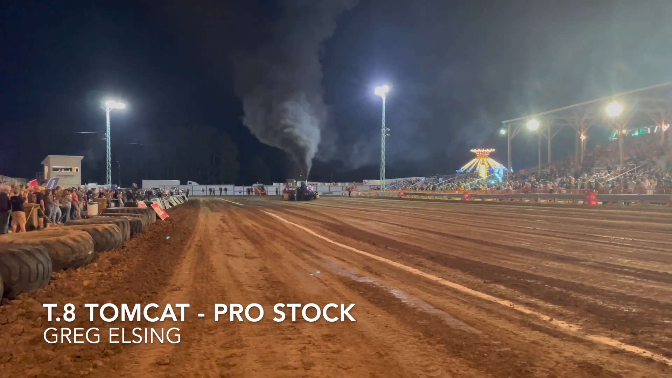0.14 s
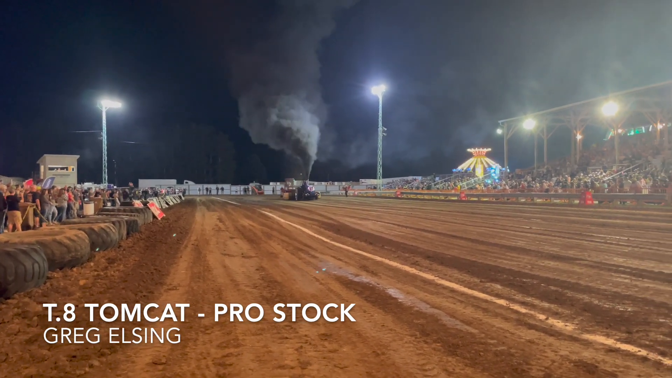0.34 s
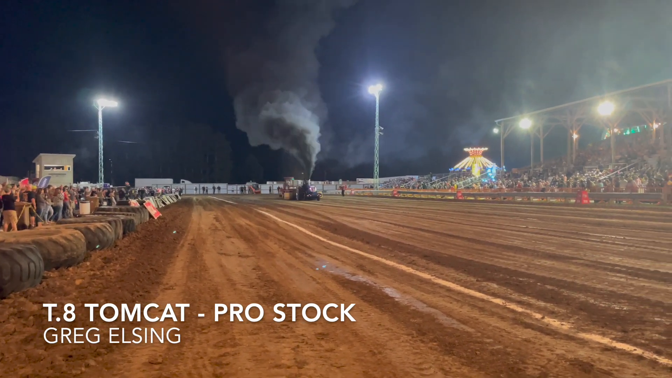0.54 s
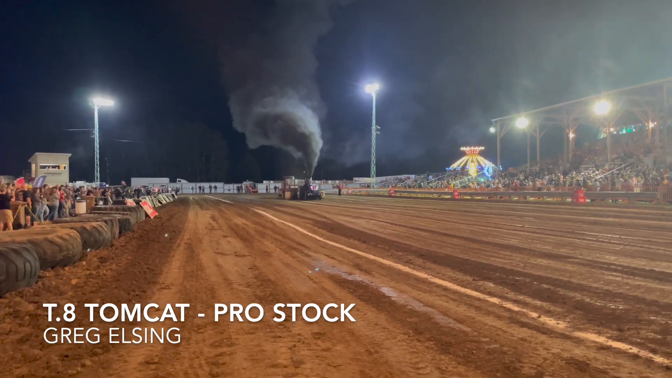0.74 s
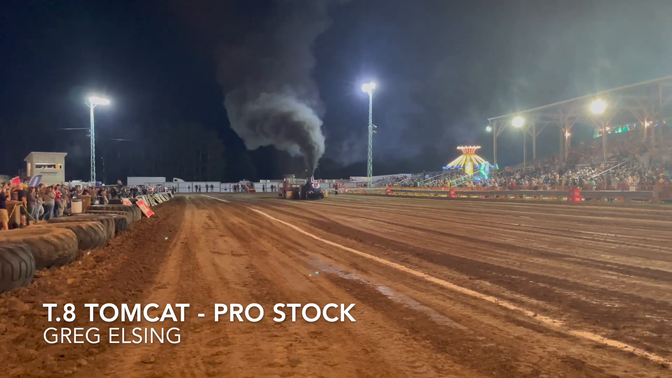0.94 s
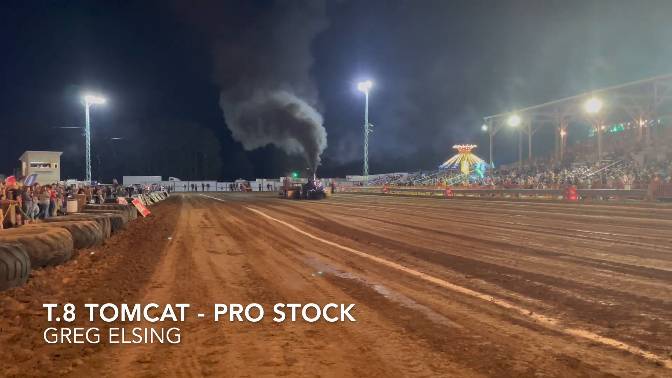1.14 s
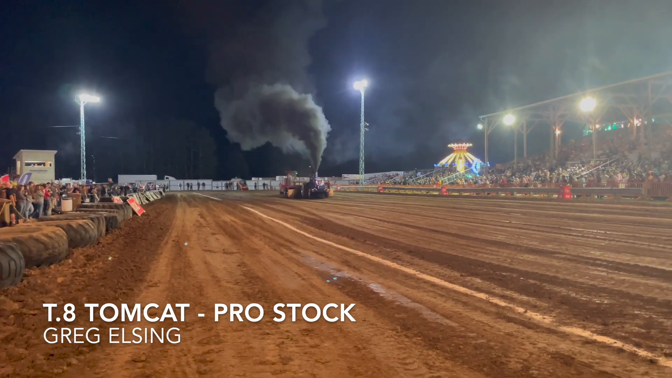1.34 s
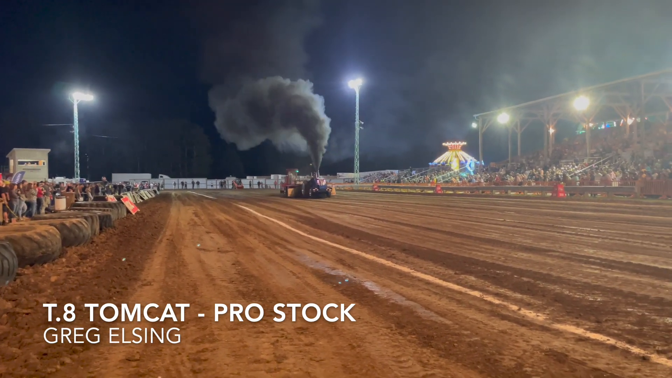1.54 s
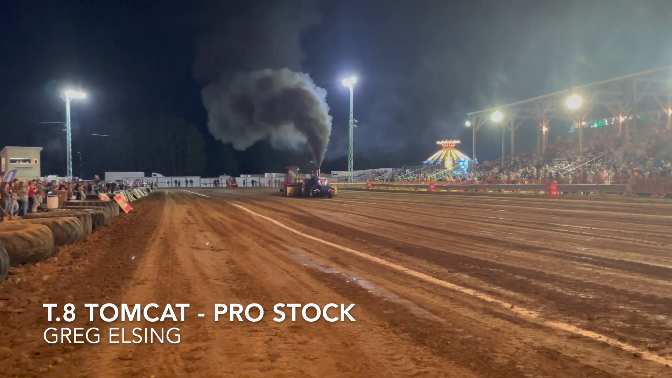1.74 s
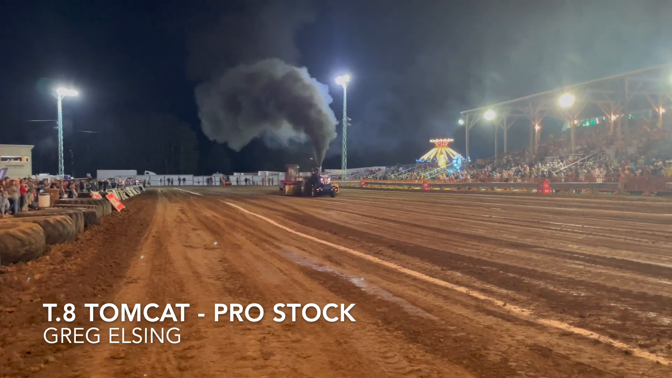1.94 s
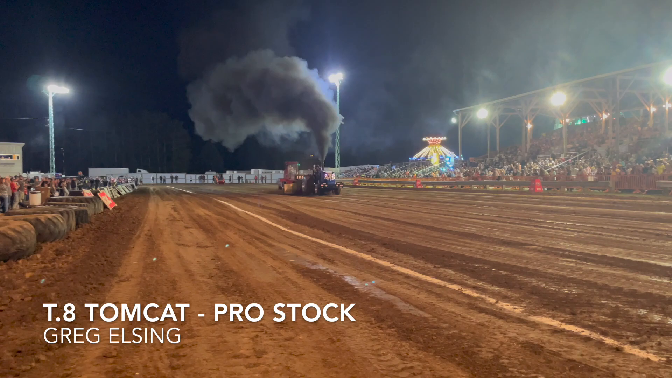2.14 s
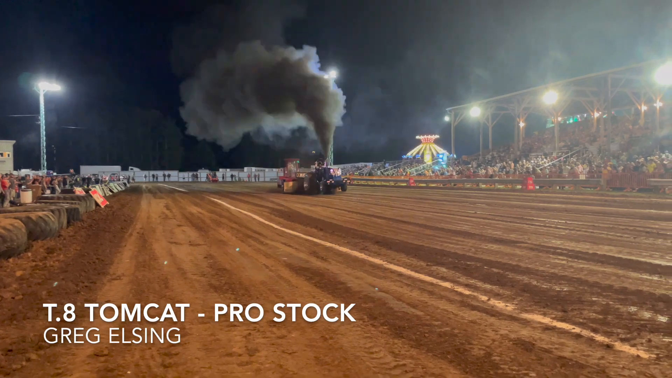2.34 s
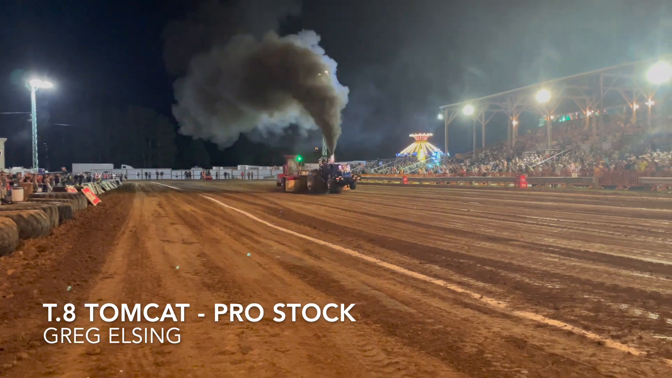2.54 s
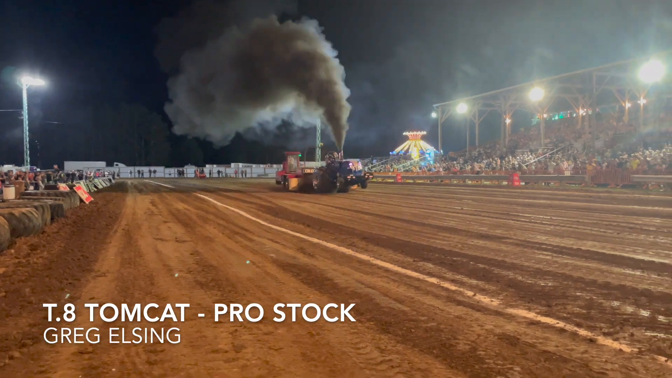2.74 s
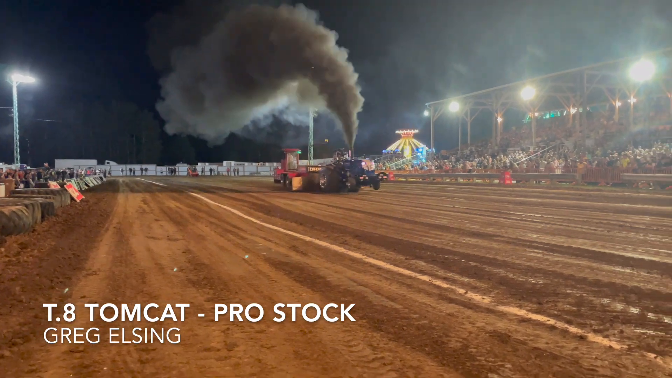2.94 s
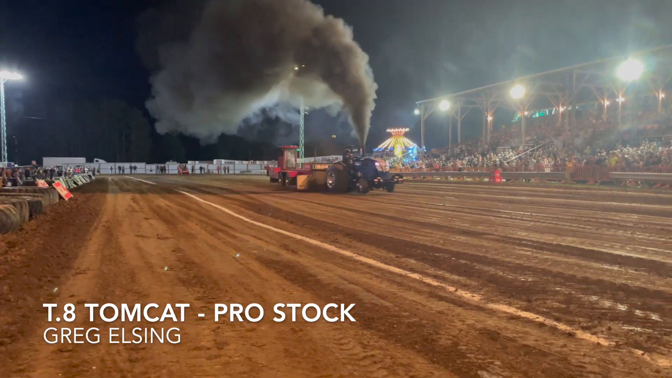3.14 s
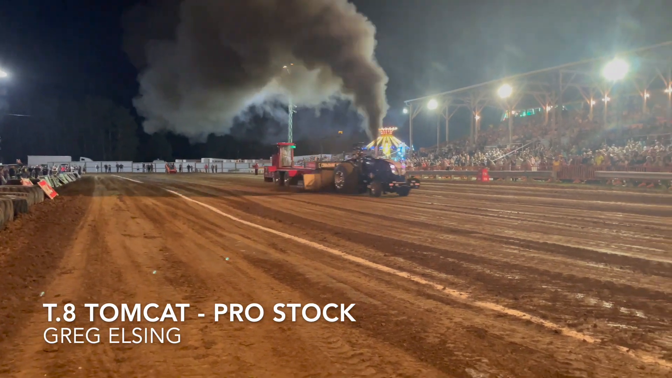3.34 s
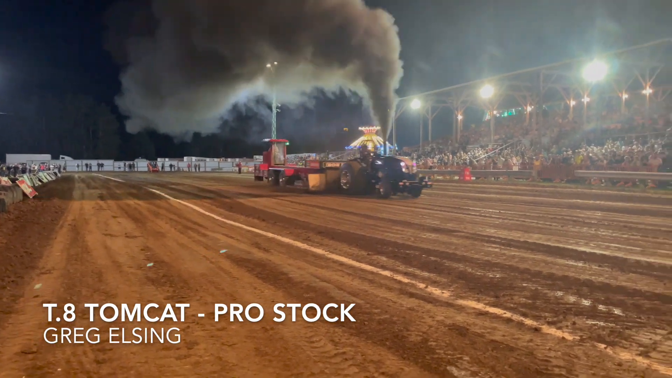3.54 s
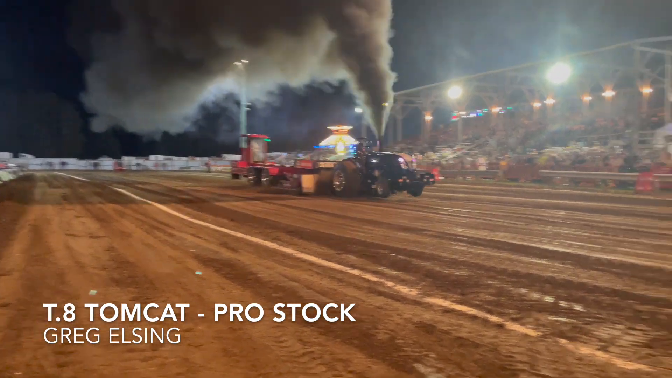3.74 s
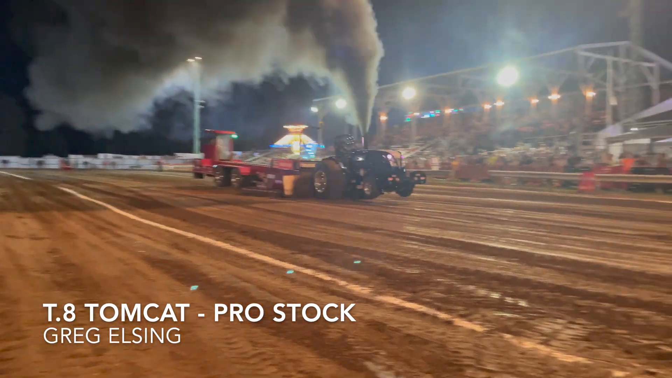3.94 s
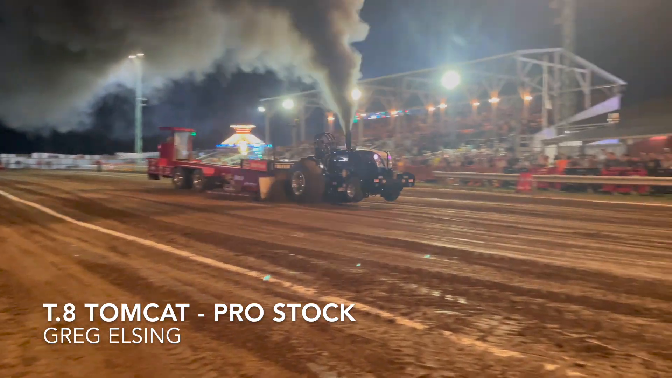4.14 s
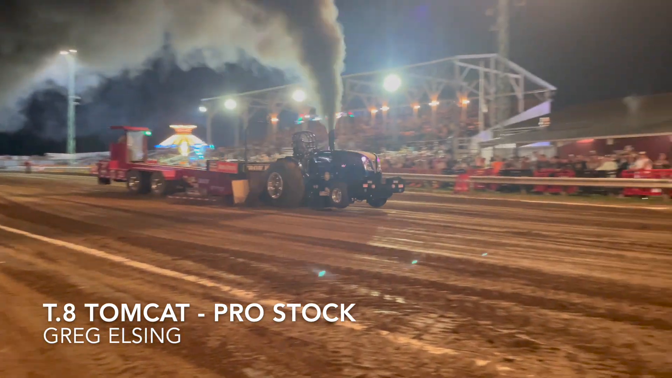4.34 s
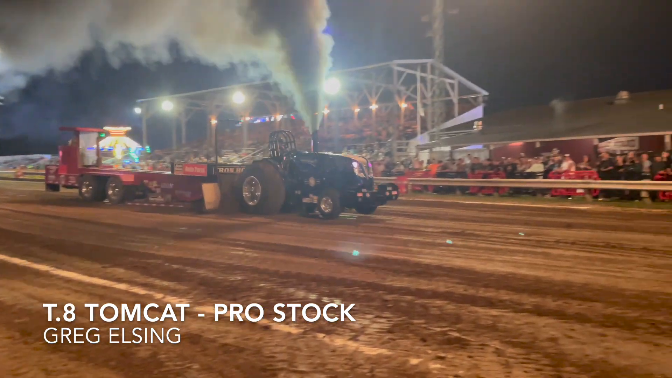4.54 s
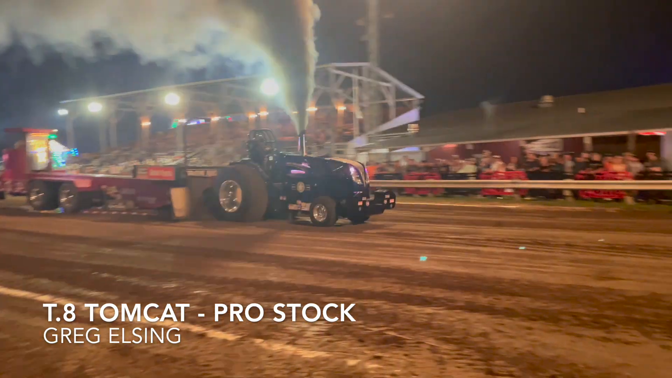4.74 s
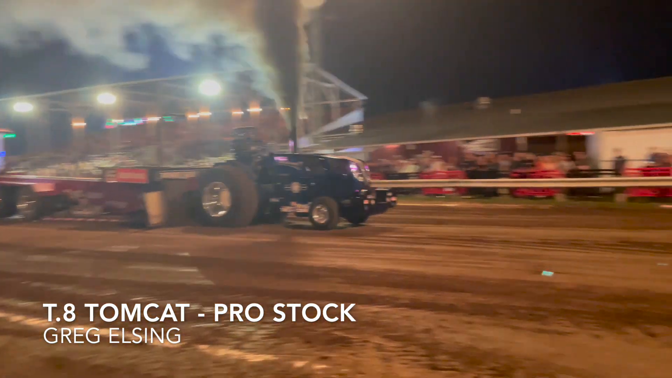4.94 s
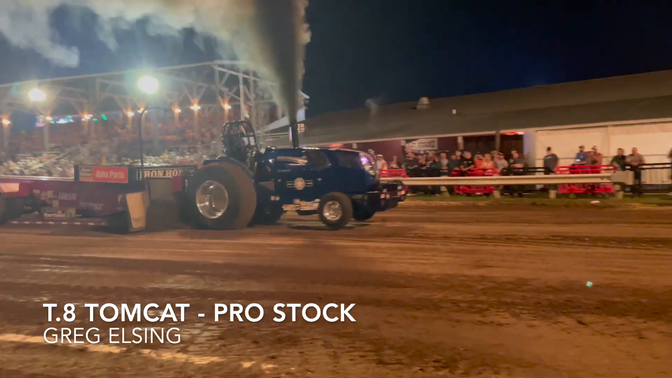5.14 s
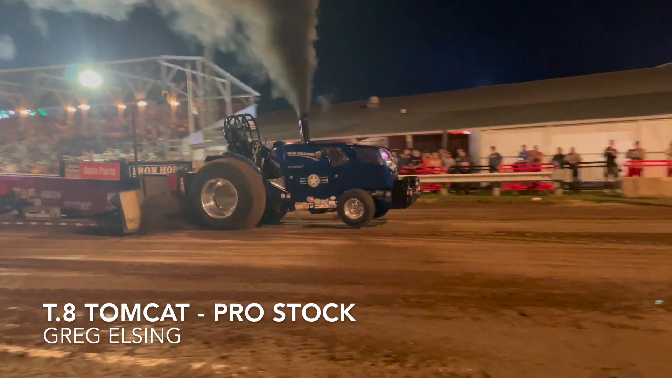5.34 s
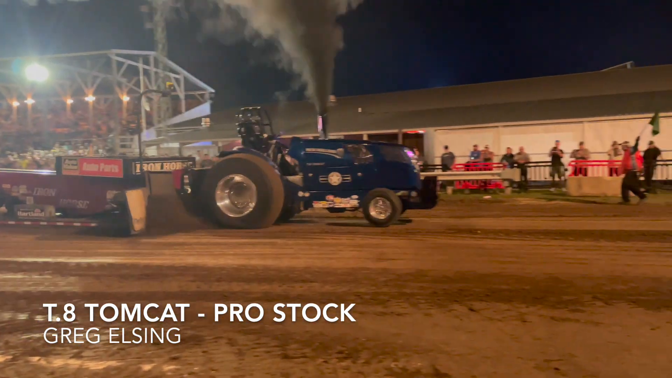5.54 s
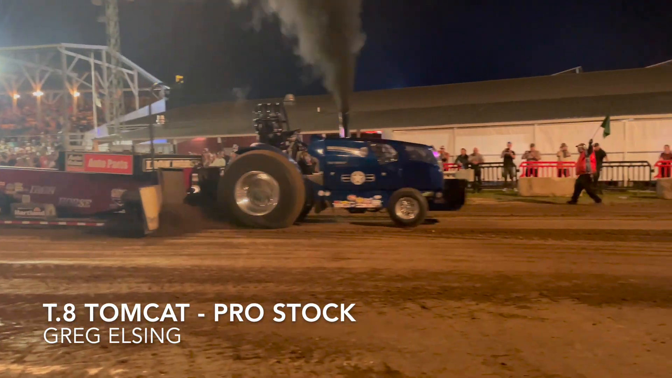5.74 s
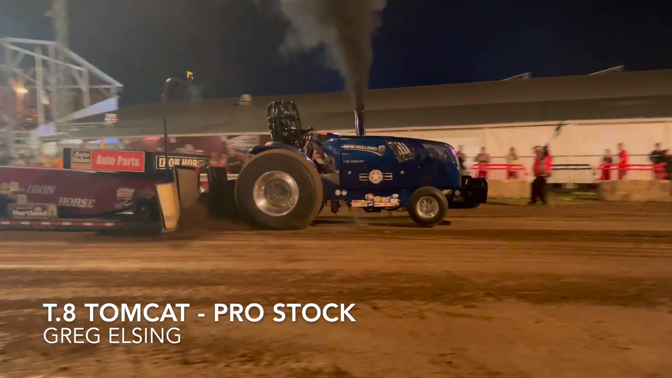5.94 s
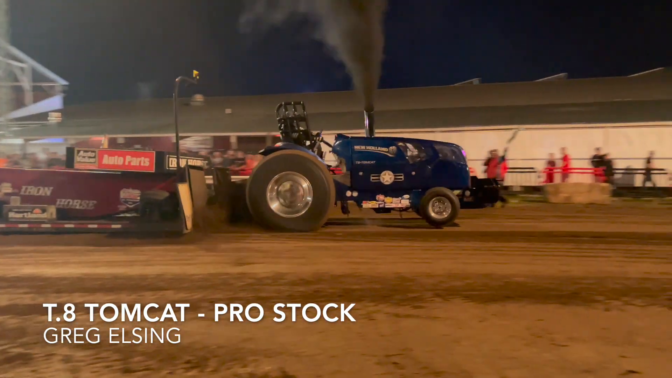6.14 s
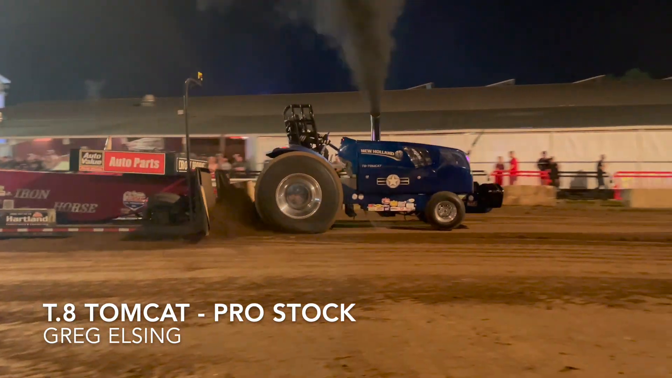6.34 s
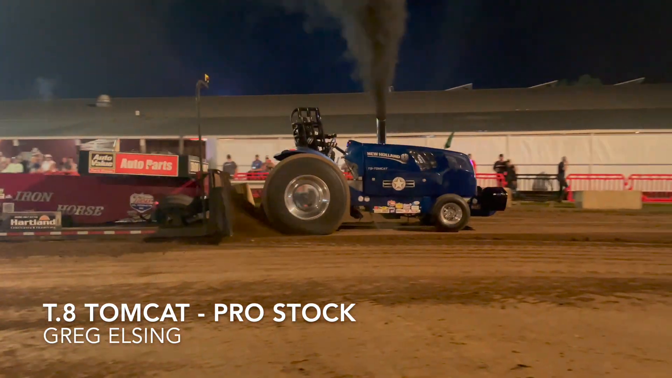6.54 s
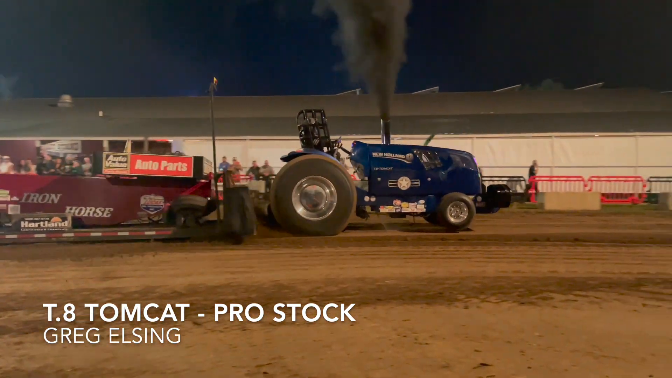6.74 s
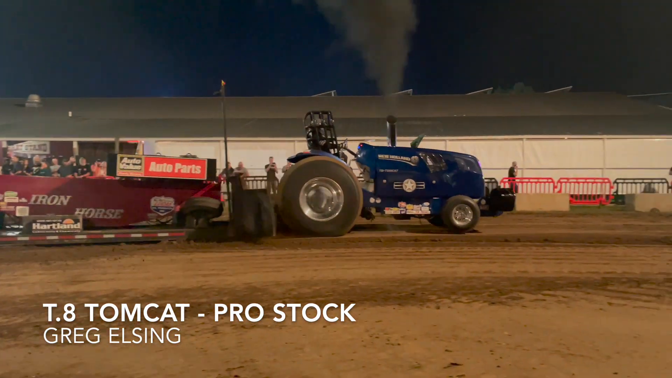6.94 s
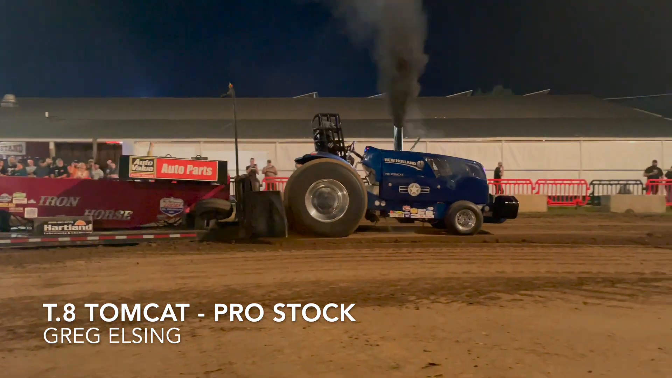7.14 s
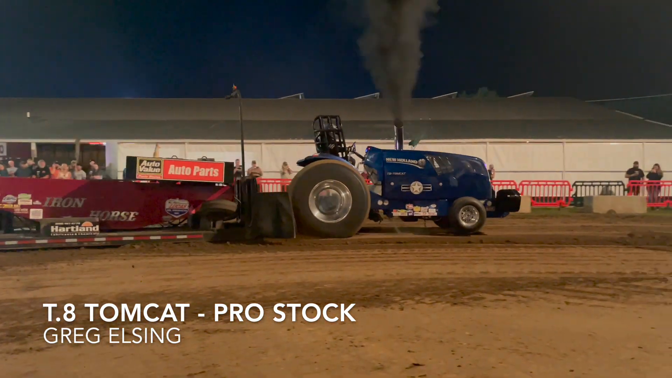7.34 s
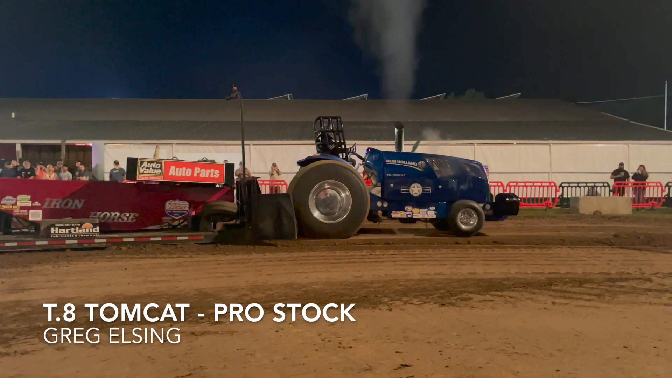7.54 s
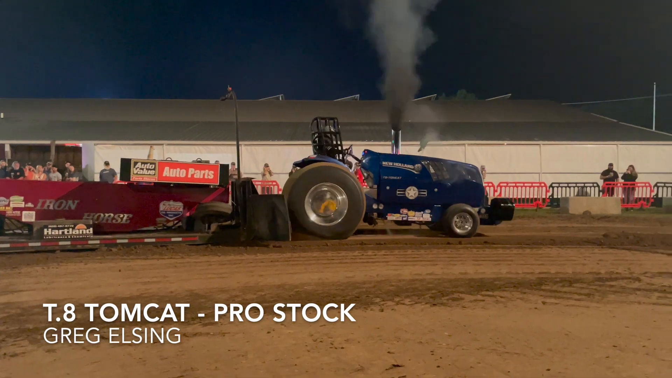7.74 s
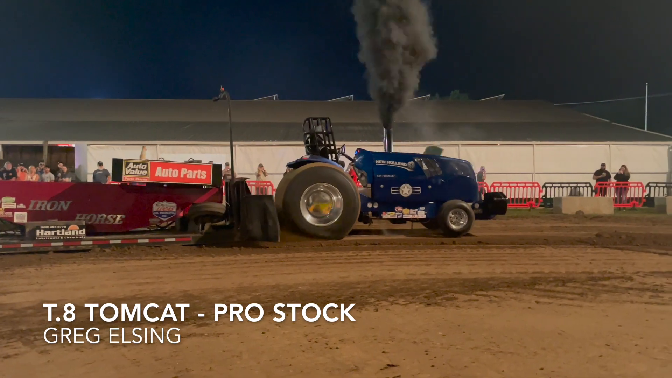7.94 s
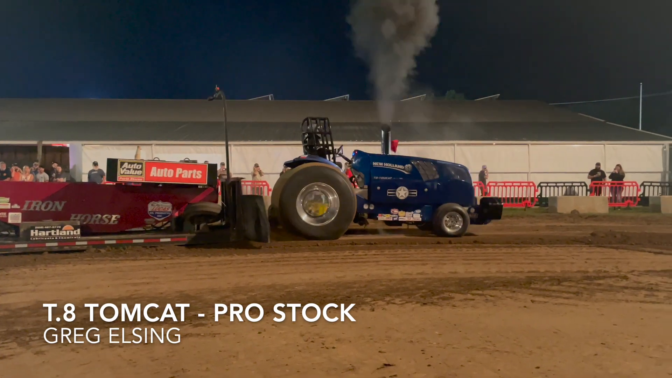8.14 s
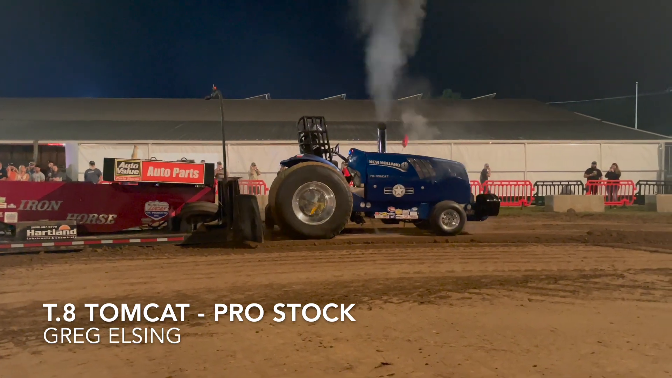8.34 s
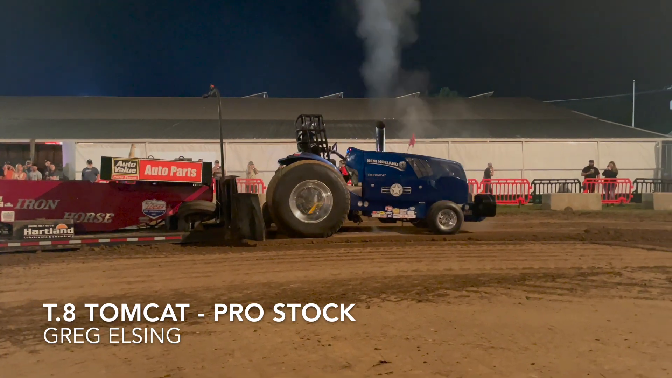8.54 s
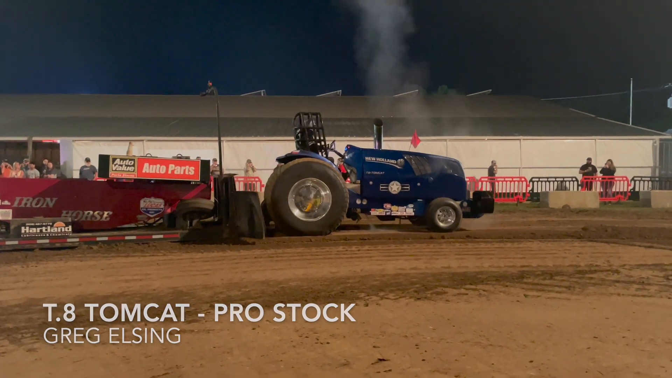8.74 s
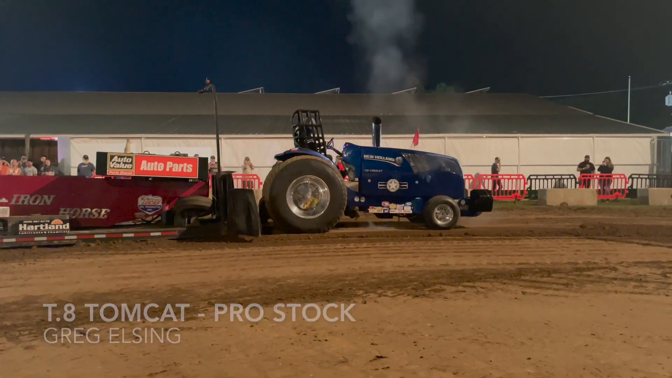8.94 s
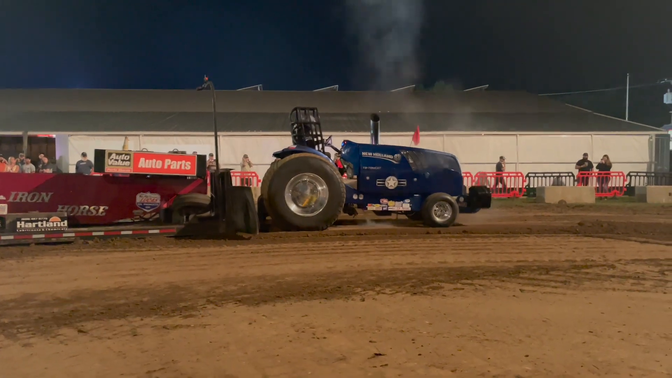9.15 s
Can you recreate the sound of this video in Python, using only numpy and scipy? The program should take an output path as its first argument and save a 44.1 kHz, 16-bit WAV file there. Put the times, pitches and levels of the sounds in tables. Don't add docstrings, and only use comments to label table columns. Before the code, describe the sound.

Outdoors at night, a highly tuned turbo diesel tractor drags a heavy sled at full throttle towards a hand-held stereo phone. A steady mid-low hum wavers in pitch under a throbbing roar and broad exhaust hiss. It passes close, the hum thinning as hiss and roar dominate. Around seven seconds the throttle shuts, the turbo chuffs several times, stray blips bark, and the whistle and engine sink towards idle.

```python
import sys
import numpy as np
from scipy import signal
from scipy.fft import rfft, irfft, next_fast_len
from scipy.io import wavfile
from scipy.ndimage import uniform_filter1d, map_coordinates

SR = 44100
rng = np.random.default_rng(int(sys.argv[2]) if len(sys.argv) > 2 else 0)


def how_loud(loudness_db):
    steps = np.asarray(loudness_db, float) / 20
    return 10 ** steps


def inscribe(sig):
    pcm = np.round(np.clip(np.atleast_2d(sig).T, -1, 1) * 32767)
    wavfile.write(sys.argv[1], SR, pcm.astype(np.int16))


N = 405710

# freq_hz, level_db (per Hz)
YARD_COLOUR = [(35, -33), (60, -26), (129, 5), (503, -10), (780, 2), (982, -12), (4110, -13), (8230, -37),
               (9450, -52), (11100, -27), (15000, -38)]
# freq_hz, level_db (per Hz)
RUMBLE_COLOUR = [(22, -42), (40, -6.5), (70, -6), (200, -0.5), (330, -2.5), (500, -13.5), (700, -32.5)]
# time_s, bearing (0 ahead, 1 abreast, 2 at rest), nearness (0-1)
BEARING = [(0, 0, 0.14), (2.5, 0.05, 0.6), (3.5, 0.61, 1), (5.2, 0.56, 0.75), (7, 1.42, 0.99),
           (7.15, 2.5, 1), (9.2, 1.4, 0.87)]
HEARD_AT = [0, .08, .49, .65, .8, 1.07, 1.3]
OCTAVE_DB = [-34, -40, -53, -54, -52, -51, -49]
UNEVEN_DB = [-7, -5, -4.5, -10.5, -7, -15, -6]
OVERTONE_DB = [-32, -42, -56, -31, -32.5, -34.5, -28]
LOW_DB = [-32, -28.5, -27, -22.5, -28, -29, -26.5]
HIGH_DB = [-25, -24.5, -23, -26, -27, -27, -28.5]
HISS_DB = [-29, -29, -25, -27, -27.5, -27.5, -28]
DRAG_DB = [-37.5, -41.5, -45.5, -45.5, -44, -54, -50]

# time_s, whistle_hz, boost_left_db
TURBINE = [(5.5, 8284, 0), (7, 8650, 0), (7.43, 8930, -2.5), (7.64, 8110, -7), (8.06, 6600, -7.5),
           (8.4, 5650, -13), (8.66, 4900, -18), (8.97, 4053, -20.5), (9.2, 3570, -26)]
BOOST_SHARE = (1.13, 1.07, 0.97, 0.85, 0.51)
# time_s, half_width_s, level_db
GLINTS = [(7.36, .14, -40), (7.64, .03, -44), (7.8, .025, -45), (8.52, .06, -53), (8.66, .06, -49),
          (8.8, .07, -49), (9.1, .14, -56)]
# start_s, level_db (rms), length_s, duct_note_hz, note_over_rush_db
SURGES = [
    (7.084, -21.5, 0.059, 832, -13),
    (7.532, -26.5, 0.066, 897, -1),
    (7.709, -28, 0.053, 832, -1.5),
    (8.189, -34.5, 0.045, 752, 10.5),
    (8.37, -38.5, 0.0673, 631, -2),
    (8.756, -44, .07, 792, -1),
]
# lead_s, level_change_db
STALLS = [(.11, -20), (0.089, -10), (0.086, -6), (.13, -15), (.11, -8), (0.055, 8)]
# freq_hz, level_db
INTAKE_COLOUR = [(400, -33), (650, 10), (800, 3), (1050, 5), (1500, 4), (2450, -3), (2900, -15.5),
                 (5000, -11), (9000, -26), (15000, -40)]

# freq_hz, level_db (per Hz)
LOW_COLOUR = [(120, -73), (200, -6), (300, -12.5), (460, -14.5), (520, -15), (600, -8), (770, -2),
              (850, -3.5), (970, -15), (1100, -24), (1450, -50)]
# freq_hz, level_db (per Hz)
HIGH_COLOURS = [
    [(560, -20), (950, -17), (1110, -7.5), (1260, -12.5), (1460, -2.5), (1680, 2.5), (1780, -2.5),
     (1940, -12), (2180, -4), (2910, -22.5), (3300, -10), (4290, -69), (7260, -120)],
    [(560, -70), (950, -10), (1100, 5), (1240, -3.5), (1380, 4), (1640, 1.5), (2080, 0.5), (2320, -4),
     (2650, -4), (2850, -4.5), (3300, -10.5), (4290, -17), (7260, -120)],
    [(560, -43), (950, -25), (1270, -7), (1510, -6), (1540, -10), (1980, -0.5), (2300, -16.5), (2610, -13),
     (3300, -32), (4290, -52), (7260, -120)],
]
# freq_hz, level_db (per Hz)
HISS_COLOURS = [
    [(2800, -6), (3300, -11), (3800, 0.5), (4500, -3), (5100, 7), (5600, -7.5), (5950, 5.5), (7000, -3),
     (8000, -2.5), (9100, -27), (10000, -9.5), (10800, 2), (13500, -7), (15700, -73)],
    [(2800, -8.5), (3300, -6.5), (4200, -1.5), (5200, -1.5), (5600, -7), (5950, 0), (7000, -1),
     (7500, -11.5), (8500, -5.5), (9400, -13), (10300, -9.5), (10800, -1.5), (13000, -4), (15700, -11.5)],
]
# freq_hz, level_db
STACK = [(30, -25), (60, -12), (80, -7), (380, -5.5), (470, -20.5), (560, -3.5), (620, 2), (900, -11),
         (1000, -35)]
# cycle_order, level_db up to abreast, change_at_rest_db (grows as bearing goes from
UNEVEN_ORDERS = [(2, 0, -12), (3, -4, -7), (4, 2, 0), (5, -12, -14), (7, -11, -16), (8, -3.5, -18),
                 (9, -8, -18), (10, -6, -18)]
# cycle_order, level_db up to abreast, change_at_rest_db (grows as bearing goes from 1 to 2)
OVERTONE_ORDERS = [(11, -14, -20), (13, -10, -20), (14, -8, -20), (15, -2, -20), (16, -1, -20),
                   (17, -1, -20), (18, 0, -20), (19, -1, -16), (20, 0, -16), (21, -3, -14), (22, -4, -14),
                   (24, -6, -14)]
# time_s, firing_hz
PULL = [(0.0, 252), (0.2, 258.2), (0.35, 237.2), (0.63, 249), (0.85, 227.8), (1.14, 247), (1.74, 252.1),
        (1.94, 233.8), (2.25, 228.7), (2.69, 237.2), (2.73, 248.3), (4.51, 228.6), (5.59, 236.4),
        (5.85, 226.2), (6.25, 244.8), (6.74, 240.2), (6.94, 262.8), (7.1, 261.4)]
# time_s, firing_hz
COAST = [(7.15, 255), (7.2, 199.2), (7.401, 228), (7.48, 216.3), (7.72, 168.8), (8.09, 184), (8.33, 164.3),
         (8.799, 149.9), (9.2, 139.4)]
# time_s, half_width_s, firing_change_hz
SNAGS = [(2.86, 0.097, 5), (3.4, .13, -7), (3.64, 0.067, 3), (3.8, 0.067, -5), (4.13, 0.1007, 4),
         (4.33, .1, -3), (4.9, .15, 2)]
# time_s, level_db
EFFORT = [(0.0, -17.5), (1.52, -18.5), (1.64, -15), (2.0, -19.5), (2.89, -18.5), (3.06, -22), (3.18, -15.5),
          (3.32, -20.5), (3.42, -15), (3.91, -23), (4.11, -17.5), (5.14, -22.5), (5.18, -31), (5.57, -29.5),
          (6.43, -34.5), (6.49, -42), (6.68, -33), (7.1, -36.5)]
# start_s, length_s, firing_tone_db, uneven_tones_db
BLIPS = [(7.206, 0.092, -39, -44), (7.327, 0.13, -28, -46), (7.717, 0.32, -27, -34.5),
         (7.924, .2, -54, -29.5), (8.097, 1.2, -57, -38.5), (8.776, 0.038, -30, -48),
         (8.949, .3, -41.5, -53)]

# freq_hz, side_over_mid_db, share_tied_to_mid (0-1), phase_rad
PORTS = [(40, -6, .2, 1.5), (90, -11, .25, 2.3), (250, -12.5, .7, 2.4), (700, -5.6, .75, 1.5),
         (1700, -3.4, .75, 1.8), (2300, -.5, .8, 1.9), (3200, 3, .65, 1.5), (4000, 4, .65, .8),
         (5000, 3.2, .8, .3), (6500, 1, .75, .3), (8300, 4.5, .55, 0), (9500, 11.5, .2, 1.6),
         (10300, 1.5, .45, 1.5), (11200, -12, .1, 1.6)]

CYLINDERS = 6
LIFT_S = 7.17
IDLE_DB, IDLE_UNEVEN_DB, IDLE_OCTAVE_DB = -46.5, -48, -51.5
BLIP_RISE_S, BLIP_FALL_S = 0.035, 0.067
STALL_FALL_S, STALL_SHARE = 0.032, (0.67, 0.42, 0.13)


def unit(x):
    return x / np.sqrt(np.mean(x ** 2) + 1e-20)


def along(points, hz):
    f, v = np.transpose(points)
    return np.interp(np.log(hz + 1), np.log(f + 1), v)


def curves(rows):
    s, *cols = np.transpose(rows)
    return [np.interp(np.arange(N) / SR, s, c) for c in cols]


def wobble(rate):
    knots = rng.standard_normal(1200)
    coarse = np.arange(0, N + 64, 64)
    return np.interp(np.arange(N), coarse, map_coordinates(knots, [coarse * rate / SR], order=2))


def filtered(x, response):
    m = next_fast_len(N + SR // 4)
    return irfft(rfft(x, m) * response(np.fft.rfftfreq(m, 1 / SR)), m)[..., :N]


def rush(spectra, patchy_db, beat=1, blend=0, size=30):
    z = signal.stft(rng.standard_normal((2, N)), nperseg=512)[2]
    field = uniform_filter1d(rng.standard_normal(z.shape[1:]), size=3, axis=0)
    field = unit(uniform_filter1d(field, size=size, axis=1))
    fade = np.linspace(1.3, 0, len(field))[:, None]
    streaked = z * how_loud(patchy_db * fade * field)
    pair = beat * signal.istft(streaked, nperseg=512)[1][:, :N]
    colours = [unit(filtered(pair, lambda hz: how_loud(along(s, hz)))) for s in spectra]
    return sum(np.clip(1 - abs(blend - k), 0, 1) * c for k, c in enumerate(colours))


def tones(orders, cycle_hz, drift_db, blur, pipe=STACK, slack=0):
    cycle, out = np.cumsum(2 * np.pi * cycle_hz / SR), np.zeros((2, N))
    for order, db, slack_db in orders:
        swell = how_loud(db + slack * slack_db + drift_db * wobble(5) + along(pipe, order * cycle_hz))
        turn = order * cycle + blur * wobble(12) + 2 * np.pi * rng.random()
        out += swell * np.sin([turn, turn + 2.05 * wobble(6)])
    return out


def heard(levels_db):
    bearing = curves(BEARING)[0]
    return np.interp(np.maximum.accumulate(bearing), HEARD_AT, levels_db)


def boost(share):
    return share * curves(TURBINE)[1]


def stall():
    t, loss_db = np.arange(N) / SR, np.zeros(N)
    for (start_s, *_), (lead_s, depth_db) in zip(SURGES, STALLS):
        loss_db += depth_db * np.clip((t - start_s + lead_s) / STALL_FALL_S, 0, 1) * (t < start_s)
    return loss_db


def blip_gain(column):
    t, gain = np.arange(N) / SR, np.zeros(N)
    for row in BLIPS:
        rise = (t - row[0]) / BLIP_RISE_S + .5
        fall = 1 - (t - row[0] - row[1]) / BLIP_FALL_S
        gain += how_loud(row[column]) * np.clip(np.minimum(rise, fall), 0, 1)
    return gain


def yard():
    return how_loud(-42.5) * rush([YARD_COLOUR], 0.89)


def drag_rumble():
    level_db = heard(DRAG_DB) + boost(BOOST_SHARE[4]) + 12.0 + 2.0 * wobble(3.14)
    return how_loud(level_db) * rush([RUMBLE_COLOUR], 1.24)


def turbine_whistle():
    t, hz = np.arange(N) / SR, curves(TURBINE)[0]
    spool_s, lift_s = TURBINE[0][0], TURBINE[1][0]
    shine = how_loud(-61) + sum(how_loud(db) * np.exp(-((t - s) / width) ** 2) for s, width, db in GLINTS)
    turn = np.cumsum(2 * np.pi * hz * (1 + .007 * wobble(125)) / SR)
    whistle = shine * how_loud(1.5 + 3 * wobble(30)) * (t > spool_s) * np.sin([turn, turn + 2 * wobble(15)])
    loaded = np.clip(np.minimum(t - spool_s, lift_s - t) / .05, 0, 1)
    low_turn = .3255 * np.cumsum(2 * np.pi * hz / SR) + .9 * wobble(40)
    whine = loaded * how_loud(-43 + 3 * wobble(12)) * np.sin([low_turn, low_turn + 2 * wobble(15)])
    return whistle + whine


def surge_chuffs():
    t, gate, duct = np.arange(N) / SR, np.zeros(N), np.zeros(N)
    for start_s, db, length_s, note_hz, note_db in SURGES:
        rise = np.clip((t - start_s) / .005, 0, 1)
        fall = np.clip(1 - (t - start_s - length_s) / .018, 0, 1) ** 2
        puff = how_loud(db) * rise * fall
        gate += puff
        note = np.sin(2 * np.pi * note_hz * t + .8 * wobble(70))
        duct += puff * how_loud(note_db + 1.5 * wobble(60)) * note
    return gate * rush([INTAKE_COLOUR], 2.8) + duct


def crank():
    t = np.arange(N) / SR
    firing_hz, = curves(list(PULL) + list(COAST))
    snag_hz = sum(hz * np.exp(-((t - s) / width) ** 2) for s, width, hz in SNAGS)
    firing_hz = uniform_filter1d(firing_hz, size=1500) + snag_hz + 1.2 * wobble(8)
    return firing_hz / CYLINDERS


def exhaust_roar(cycle_hz):
    bearing, near = curves(BEARING)
    stall_db, gust = stall(), wobble(6.9)
    low_db, high_db, hiss_db = [heard(db) + boost(a) + b * stall_db
                                for db, a, b in zip((LOW_DB, HIGH_DB, HISS_DB), BOOST_SHARE, STALL_SHARE)]
    shaft = np.cumsum(4 * np.pi * cycle_hz / SR) + .3 * wobble(15)
    pulse = np.cos(shaft) + .6 * np.cos(2 * shaft) + .4 * np.cos(3 * shaft)
    low = how_loud(low_db - 1.46 + 0.64 * gust + 1.07 * wobble(25))
    low = low * rush([LOW_COLOUR], 0.42, how_loud(1.8 * pulse))
    high = how_loud(high_db + 0.03 + 0.34 * gust + 0.49 * wobble(25))
    high = high * rush(HIGH_COLOURS, 1.3, how_loud(0.68 * pulse), bearing, size=80)
    hiss = how_loud(hiss_db + 0.82 + 0.1 * gust + 0.26 * wobble(10))
    hiss = hiss * rush(HISS_COLOURS, 3.25, how_loud(0.12 * pulse), near, size=140)
    return low + high + hiss


def exhaust_hum(cycle_hz):
    loaded = np.clip((LIFT_S - np.arange(N) / SR) / BLIP_FALL_S + .5, 0, 1)
    effort = how_loud(curves(EFFORT)[0]) * loaded
    blip = blip_gain(column=2)
    firing = effort + how_loud(IDLE_DB) * (1 - loaded) + blip
    uneven = effort * how_loud(heard(UNEVEN_DB)) + how_loud(IDLE_UNEVEN_DB) * (1 - loaded) + blip_gain(column=3)
    octave = how_loud(heard(OCTAVE_DB)) * loaded + how_loud(IDLE_OCTAVE_DB) + how_loud(-19) * blip
    over_db = heard(OVERTONE_DB) + boost(BOOST_SHARE[3]) + .5 * stall()
    flat, slack = [(1, 0)], np.clip(curves(BEARING)[0] - 1, 0, 1)
    flutter = how_loud(3 + 1.7 * wobble(20))
    hum = firing * flutter * tones([(CYLINDERS, 0, 0)], cycle_hz, drift_db=.5, blur=.3, pipe=flat)
    hum += octave * tones([(2 * CYLINDERS, 0, 0)], cycle_hz, drift_db=3, blur=.45, pipe=flat)
    hum += uneven * tones(UNEVEN_ORDERS, cycle_hz, drift_db=2.2, blur=.3, slack=slack)
    hum += how_loud(over_db) * tones(OVERTONE_ORDERS, cycle_hz, drift_db=2.4, blur=.27, slack=slack)
    return hum


def scene():
    cycle_hz = crank()
    background = yard() + drag_rumble()
    turbo = turbine_whistle() + surge_chuffs()
    direct, scattered = background + turbo + exhaust_roar(cycle_hz) + exhaust_hum(cycle_hz)
    hz_at, side_db, tied, phase = np.transpose(PORTS)
    read = lambda v, hz: along(np.transpose([hz_at, v]), hz)
    share = lambda hz: np.clip(read(tied, hz), 0, 1)
    side = filtered(direct, lambda hz: how_loud(read(side_db, hz)) * share(hz) * np.exp(1j * read(phase, hz)))
    side += filtered(scattered, lambda hz: how_loud(read(side_db, hz)) * np.sqrt(1 - share(hz) ** 2))
    return np.array([direct + side, direct - side])


def roll_off(x):
    return signal.sosfilt(signal.butter(12, 15700, fs=SR, output="sos"), x)


def record(dry):
    dry = filtered(dry, lambda hz: hz ** 3 / (hz ** 3 + 36 ** 3) * (hz < 15700))
    mid, side = (dry[0] + dry[1]) / 2, (dry[0] - dry[1]) / 2
    side = filtered(side, lambda hz: np.where(hz < 10500, 1, .5))
    return roll_off(np.array([mid + side, mid - side]))


dry = scene()
out = record(dry)
inscribe(out)
```